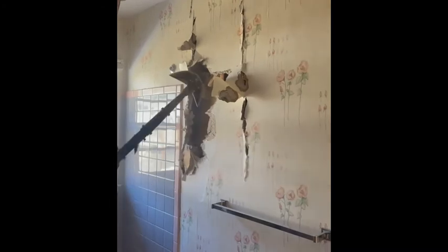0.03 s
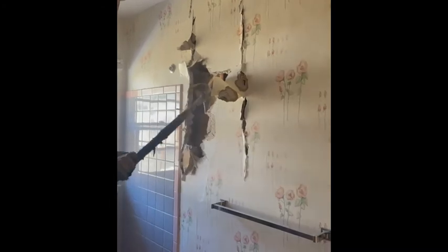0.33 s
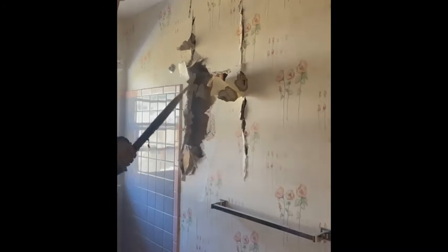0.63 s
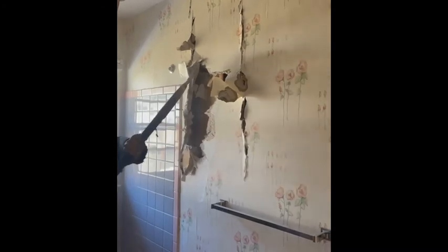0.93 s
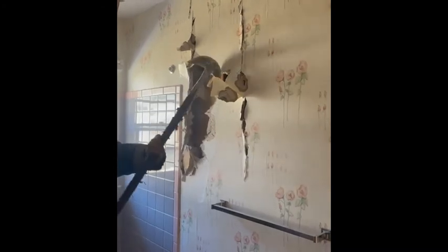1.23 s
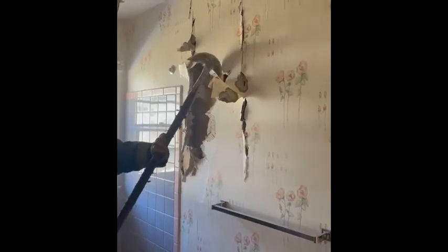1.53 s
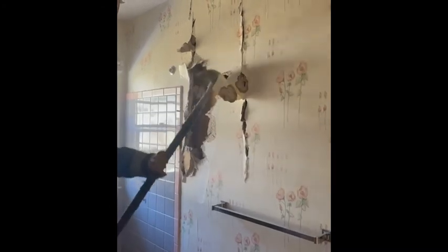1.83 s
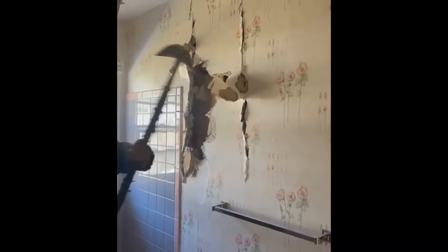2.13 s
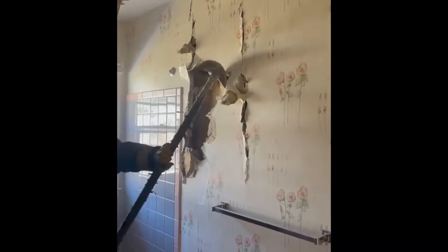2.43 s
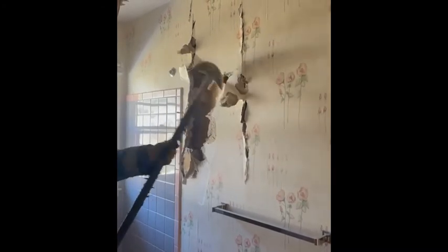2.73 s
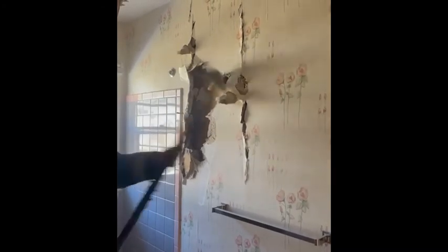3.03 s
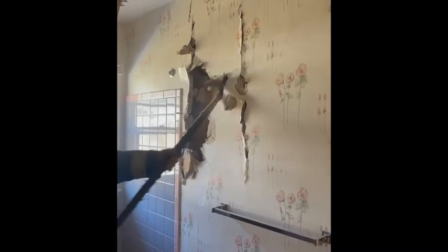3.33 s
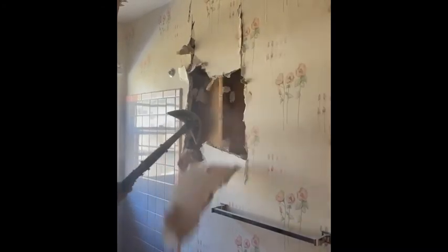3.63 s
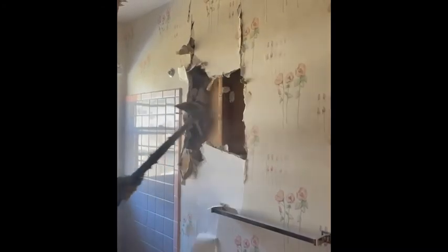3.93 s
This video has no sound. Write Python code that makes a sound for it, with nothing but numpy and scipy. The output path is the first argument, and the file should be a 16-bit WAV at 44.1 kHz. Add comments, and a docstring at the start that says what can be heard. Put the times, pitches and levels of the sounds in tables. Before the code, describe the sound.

A steel hook knocks, scrapes and smashes through wallboard until a slab crashes down.

```python
"""In a small tiled room, over a low wavering hum, a steel hook on a long pole scrapes at a rumbling wall.
The hook knocks on the hard frame, and its steel head rings on. From about 1.2 s it bites into the wallboard:
each blow cracks the gypsum and makes the hollow wall boom, and grit trickles in between.
Near 2.5 s the prying hook squeaks. At last a slab tears loose in a shower of crumbs and crashes down."""
import sys
import numpy as np
from scipy import signal
from scipy.fft import rfft, irfft
from scipy.io import wavfile

SR = 44100
rng = np.random.default_rng(int(sys.argv[2]) if len(sys.argv) > 2 else 0)


def transcribe(signal):
    """Save signal, clipped to [-1, 1], as a 16-bit WAV file at the path in sys.argv[1]."""
    frames = np.atleast_2d(signal).T
    limited = np.clip(frames, -1, 1)
    pcm = np.round(limited * 32767).astype(np.int16)
    wavfile.write(sys.argv[1], SR, pcm)


N = 176400
HIT_N = SR  # samples in one hit and its echo
AGE, HZ = np.arange(HIT_N) / SR, np.fft.rfftfreq(HIT_N, 1 / SR)  # time and frequency axes of a hit


def undb(db):
    """Turn decibels into a factor to multiply by."""
    return 10 ** (np.asarray(db) / 20)


def unit(x):
    """Scale x to an average (rms) size of 1."""
    return x / np.sqrt(np.mean(x ** 2))


def on_log(hz, points):
    """Read between (frequency, value) points, with octaves evenly spaced."""
    f, values = np.array(points).T
    return np.interp(np.log(hz + 1), np.log(f), values)


def shape(x, gain):
    """Filter x: gain(f) says how much of each frequency to keep."""
    n = x.shape[-1]
    return irfft(rfft(x) * gain(np.fft.rfftfreq(n, 1 / SR)), n)


def causal(gain):
    """Turn a gain curve into a filter that makes no sound before the hit (minimum phase)."""
    cepstrum = irfft(np.log(gain + 1e-5))
    cepstrum[1:HIT_N // 2] *= 2
    cepstrum[HIT_N // 2 + 1:] = 0
    return np.exp(rfft(cepstrum))


def peak(hz, width_hz):
    """A bump of height 1 around one frequency."""
    return 1 / (1 + (2 * (HZ - hz) / width_hz) ** 2)


def burst(x, db, span_s=.04):
    """Give a hit the energy of a steady sound that lasts span_s at this level."""
    return unit(x) * undb(db) * np.sqrt(span_s * SR / HIT_N)


def add(out, start, x):
    """Mix x in from a start time."""
    i = int(start * SR)
    out[:, i:i + x.shape[-1]] += x[:, :N - i]


def grains(n, per_s, spread_db=4):
    """Random clicks, most small and a few large."""
    size = undb(spread_db * np.minimum(rng.exponential(size=n), 5))
    return (rng.random(n) < per_s / SR) * size * rng.choice([-1, 1], n)


# How wide the sound is heard, swinging narrow and wide from pitch to pitch (f/Hz, side level over middle
# level/dB)
STEREO_WIDTH = [(130, -51), (260, -18), (430, -8), (580, -12), (1050, -4.5), (1800, -15.5), (2750, -2.5),
                (4600, -2.5), (5400, -5), (6400, 0.5), (7700, 20), (8900, 10), (10500, -16)]
def stereo_noise(n):
    """Noise that is alike in both ears in the bass and wide in the treble."""
    mid, side = rng.standard_normal((2, n))
    side = shape(side, lambda f: undb(on_log(f, STEREO_WIDTH)))
    pair = np.array([mid + side, mid - side])
    return shape(pair, lambda f: 1 / np.hypot(1, undb(on_log(f, STEREO_WIDTH))))


# How long the room echoes (f/Hz, time to fade by 60 dB/s)
ECHO_TIMES = [(200, 0.3), (700, 0.25), (2000, 0.24), (5000, 0.26), (11000, 0.17)]
def room(direct_db=-9, rise_s=.00058):
    """One click in the room: the direct sound, then dense echoes off the tiles."""
    noise = stereo_noise(HIT_N)
    centres, fades = zip(*ECHO_TIMES)
    tail = 0
    for weights, fade_s in zip(np.eye(len(centres)), fades):
        band = shape(noise, lambda f: on_log(f, list(zip(centres, weights))))
        tail = tail + band * 1000 ** (-AGE / fade_s)
    spectrum = rfft(tail)
    tail = irfft(spectrum / np.mean(np.abs(spectrum) ** 2, axis=0) ** .25)  # tame chance peaks
    tail *= (1 - np.exp(-AGE / rise_s)) * np.clip(2 - 4 * AGE, 0, 1)
    tail = unit(tail) / np.sqrt(HIT_N)
    tail[:, 0] += undb(direct_db)
    return tail


# Tone of the room's air (f/Hz, relative level/dB)
AIR_TONE = [(150, 21), (600, 19.5), (2000, -22), (12000, 1)]
def hum_and_air(hum_hz=66, waver_hz=2.6, hum_db=-54, air_db=-75):
    """A low hum wavers in pitch over the faint noise of the air."""
    drift = unit(shape(rng.standard_normal(N), lambda f: np.exp(-f / 4)))
    hum = np.sin(2 * np.pi * np.cumsum(hum_hz + waver_hz * drift) / SR)
    air = shape(stereo_noise(N), lambda f: undb(on_log(f, AIR_TONE)))
    return undb(hum_db) * unit(hum) + undb(air_db) * unit(air)


# How loud the strained wall groans (t/s, level/dB)
RUMBLE_LEVELS = [(0, -37), (.35, -45.5), (.6, -49), (1.14, -59.5), (1.45, -40), (2.07, -46.5), (2.38, -33),
                 (2.92, -50), (3.2, -27), (3.68, -38), (4, -39)]
# Tone of that groan (f/Hz, relative level/dB)
RUMBLE_TONE = [(20, -37), (48, -1), (66, 13), (78, 0), (600, -20), (1500, -29.5), (5000, -66)]
def wall_rumble(t):
    """The hollow wall rumbles while the hook drags and levers at it."""
    rumble = shape(stereo_noise(N), lambda f: undb(on_log(f, RUMBLE_TONE)))
    return unit(rumble) * undb(np.interp(t, *np.array(RUMBLE_LEVELS).T))


# Pitches at which the board and the hook in it ring (f/Hz, width/Hz, boost/dB)
BOARD_PEAKS = [(69.2, 5.3, 6), (396, 33, 3), (520.6, 24, 5.5), (638, 123, 3.5), (899, 84, 3.5),
               (1377, 36, 1), (2300, 33, 3.5), (3510, 14, 7), (4600, 190, -8.5)]
def board_boost_db():
    """The board and hook make some pitches louder and one softer."""
    return sum(db * peak(hz, width) for hz, width, db in BOARD_PEAKS)


# Scraping and falling crumbs, before each layer's boost (t/s, rasp level/dB, grit level/dB)
CRUMB_LEVELS = [(0, -48.5, -64.5), (.17, -49.5, -68.5), (.25, -63.5, -73), (.67, -56.5, -68),
                (.83, -65.5, -72.5), (1.48, -62, -73.5), (1.7, -57.5, -64.5), (1.81, -57, -50),
                (1.88, -54, -61), (2, -70.5, -85), (2.29, -45, -56), (2.4, -60, -70), (2.548, -47, -52),
                (2.6, -55.5, -65), (2.681, -48.5, -48), (2.78, -63.5, -73.5), (2.94, -66, -70),
                (3.1, -38, -67), (3.24, -50.5, -60), (3.329, -30.5, -37), (3.52, -45.5, -48.5),
                (3.59, -31, -36.5), (3.759, -24.5, -25), (3.839, -35.5, -34), (3.888, -25, -27.5),
                (4, -37.5, -52.5)]
# Tone of the rough rasp (f/Hz, relative level/dB)
RASP_TONE = [(200, 4.5), (1400, -1), (2300, 1), (6000, -5.5), (7500, -30), (12000, -20)]
# Tone of the fine grit (f/Hz, relative level/dB)
GRIT_TONE = [(2000, -3), (5000, 6), (7000, 3), (10500, 2), (12500, -13)]
def crumbs(t, spots=4, per_s=650, ring_share=.37, rasp_boost_db=1, grit_boost_db=3):
    """Gypsum grains rasp under the hook and shower down at several spots as the slab tears away."""
    times, rasp_db, grit_db = np.array(CRUMB_LEVELS).T
    clicks = sum(rfft(grains(N, per_s / spots)) * rfft(room(), N) for _ in range(spots))
    out = 0
    for levels, tone in ((rasp_db + rasp_boost_db, RASP_TONE), (grit_db + grit_boost_db, GRIT_TONE)):
        one_grain = irfft(causal(undb(on_log(HZ, tone) + ring_share * board_boost_db())))
        shower = unit(irfft(clicks * rfft(one_grain, N), N))
        out = out + shower * undb(np.interp(t, times, levels))
    return out


# Knocks on the frame (t/s, level/dB, pitch factor, treble cut-off/Hz, spot from hook's point 0 to back 1)
FRAME_KNOCKS = [(.095, -24, 1.01, 2100, 0), (.505, -25.5, 1.023, 1830, 1), (.665, -46.5, .92, 1100, 1),
                (.76, -44, .9, 905, 0.61), (2.672, -46, 1.2, 1500, 0.79), (2.724, -45.5, 1, 980, 0.65)]
# Notes of hook and pole (f/Hz, width/Hz, level when hit on the point/dB, level when hit on the back/dB)
HOOK_NOTES = [(345, 170, 5.5, 0), (515, 34, 8, 0), (686.6, 35, 6, 12), (858, 35, 5, 3.5), (922, 34, 3, 0.5),
              (1070, 81, 1.5, -4), (1198, 24, 0, 3.5), (1526, 35, -2, 8.5), (1659, 14, 3, -14),
              (2680, 2400, -16, -19.5)]
# The head chatters within each knock (t/s after the knock, relative level/dB)
BOUNCES = [(0, -1.5), (.004, -1.5), (.018, -6.5)]
def hook_knocks(bass_cut_hz=200):
    """Each knock rings the hook and its pole; the spot that lands sets the mix of notes."""
    out = np.zeros((2, N))
    for start, db, pitch, top_hz, spot in FRAME_KNOCKS:
        power = sum(undb(point_db + spot * (back_db - point_db)) ** 2 * peak(hz * pitch, width)
                    for hz, width, point_db, back_db in HOOK_NOTES)
        tone = np.sqrt(power / (1 + (HZ / top_hz) ** 4))
        tone *= HZ ** 2 / (HZ ** 2 + bass_cut_hz ** 2)
        chatter = sum(undb(bounce_db) * rfft(room()) * np.exp(-2j * np.pi * HZ * delay)
                      for delay, bounce_db in BOUNCES)
        add(out, start, burst(irfft(chatter * causal(tone)), db))
    return out


# Notes of the free steel head (f/Hz, level/dB, time to fade by 60 dB/s)
STEEL_NOTES = [(1465, -58, 6.3), (607, -65, 2)]
def steel_ring(start_s=.505):
    """After one knock the head swings free and sings on, faded out after a second."""
    out = np.zeros((2, N))
    ring = sum(undb(db) * np.sin(2 * np.pi * hz * AGE) * 1000 ** (-AGE / fade_s)
               for hz, db, fade_s in STEEL_NOTES)
    fade_out = np.minimum(1, (1 - AGE) * 10)
    add(out, start_s, (ring * fade_out)[None])
    return out


def panel_ring(spectrum, delay, rise_s, fade_s):
    """The struck panel starts late, builds up and dies away."""
    noise = signal.hilbert(irfft(spectrum))
    steadier = noise.real / np.sqrt(np.abs(noise).mean(axis=0))
    age = np.maximum(AGE - delay, 0)
    return steadier * (1 - np.exp(-age / rise_s)) * 1000 ** (-age / fade_s)


def slap(delay, hz, decay_s):
    """A few swings that die quickly after a sudden push."""
    age = np.maximum(AGE - delay, 0)
    return unit(np.sin(2 * np.pi * hz * age) * age * np.exp(-2 * age / decay_s))


# Blows on the board (t/s, then level/dB of boom, body, knock, crack and dust,
# then crumbling time/s, bass delay/s, panel f/Hz)
BOARD_BLOWS = [(.388, -62, -59, -47.5, -56, -62, 0.0052, 0.006, 153),
               (1.178, -31.5, -17.5, -32, -43, -56, 0.0037, .011, 187),
               (1.250, -18.5, -15, -22.5, -36, -46, .011, .02, 195),
               (1.551, -57, -28.5, -38.5, -41.5, -45, 0.013, 0.012, 134),
               (1.582, -20, -21, -47, -53, -49, .0086, 0.0067, 131),
               (1.773, -41, -46, -47.5, -50, -52, 0.0086, 0.0043, 250),
               (1.934, -47, -41.5, -54.5, -62.5, -72, 0.0081, .004, 348),
               (2.131, -53, -42, -28, -40, -50, 0.0084, 0.0052, 218),
               (2.149, -55, -47, -34, -28.5, -29.5, 0.0025, .004, 218),
               (2.153, -15.5, -8.5, -13, -22.5, -31.5, 0.0026, .0085, 128),
               (2.315, -27, -30, -44, -48, -61, 0.013, 0.0092, 108),
               (2.636, -37, -45, -37.5, -61, -70, 0.0052, 0.005, 193),
               (2.982, -52, -32, -33.5, -22.5, -30, 0.0084, .0061, 128),
               (2.991, -11.5, -12, -12.5, -18.5, -22.5, 0.0065, .0108, 137),
               (3.036, -17, -24.5, -27, -55, -56, 0.0067, 0.0013, 130),
               (3.321, -23, -14, -27, -22.5, -24.5, 0.0033, 0.01, 176),
               (3.372, -15, -13.5, -31.5, -52, -60, 0.0073, 0.0025, 127),
               (3.450, -30, -40, -48, -34, -37, 0.014, 0.0066, 129),
               (3.738, -29, -18.5, -13.5, -17.5, -25, 0.0021, 0.0069, 214),
               (3.748, -36, -30.5, -26.5, -24.5, -38, 0.0019, 0.0016, 212),
               (3.859, -16.5, -14, -12.5, -18.5, -25, 0.0074, .0078, 235)]
# Tone of breaking board (f/Hz, relative level/dB)
BREAK_TONE = [(25, -24), (42, -11.5), (60, 4), (120, -4), (250, -8), (450, -15.5), (1600, -22.5),
              (3500, -25), (5600, -28), (7400, -38), (11000, -40)]
# Borders between boom, body, knock, crack and dust (f/Hz)
BAND_EDGES = [105, 400, 1800, 6200]
def wallboard_blows(fractures_per_s=2500, fracture_db=4.5, panel_boost_db=6, slap_db=-2, clack_hz=625):
    """Each blow is a clack and a run of tiny breaks; the panel slaps back and the hollow wall booms."""
    tone = unit(undb(on_log(HZ, BREAK_TONE) + board_boost_db()))
    below = [0 * HZ] + [1 / (1 + (HZ / edge) ** 8) for edge in BAND_EDGES] + [1 + 0 * HZ]
    bands = [causal(tone * np.sqrt(np.abs(hi - lo))) for lo, hi in zip(below, below[1:])]
    out = np.zeros((2, N))
    for start, *levels, crumble_s, delay, panel_hz in BOARD_BLOWS:
        sharpness = 1 / (1 + crumble_s / .0041)  # blows that crumble longer start more softly
        fractures = grains(HIT_N, fractures_per_s) * np.sqrt(AGE) * np.exp(-AGE / crumble_s)
        force = undb(fracture_db) * unit(fractures + 1e-18) / np.sqrt(HIT_N)
        force[0] += sharpness
        echoed = rfft(force) * rfft(room())
        knock, crack, dust = [irfft(echoed * band) for band in bands[2:]]
        panel = rfft(stereo_noise(HIT_N)) * undb(panel_boost_db * peak(panel_hz, width_hz=33))
        boom = panel_ring(panel * bands[0], delay, rise_s=.015, fade_s=.39)
        body = panel_ring(panel * bands[1], delay, rise_s=.0017, fade_s=.32)
        snap = undb(slap_db) * sharpness
        body = unit(body) + snap * slap(delay, panel_hz, decay_s=.0041)  # the panel's first flex
        knock = unit(knock) + snap * slap(0, clack_hz, decay_s=.0029)  # the hook's first touch
        parts = (boom, body, knock, crack, dust)
        add(out, start, sum(burst(part, db) for part, db in zip(parts, levels)))
    return out


def squeak(t, at_s=2.535, spread_s=.034, hz=2200, width_hz=300, db=-47):
    """The prying hook sticks and slips on the board; the slips ring at one pitch."""
    slips = irfft(rfft(grains(N, per_s=650)) * rfft(room(), N), N)
    ring = shape(slips, lambda f: 1 / (1 + 2j * (f - hz) / width_hz))
    return unit(ring) * undb(db) * np.exp(-((t - at_s) / spread_s) ** 2 / 2)


def scene():
    """Add up the short sounds and the ones that run throughout."""
    t = np.arange(N) / SR
    short_sounds = wallboard_blows() + hook_knocks() + steel_ring() + squeak(t)
    return short_sounds + crumbs(t) + wall_rumble(t) + hum_and_air()


def record(dry, shared_bass_hz=170, low_hz=24, ceiling=.85, top_hz=12000):
    """Two close microphones hear the same bass; the deepest lows are removed and peaks are rounded off, and the
    recorder cuts the highs."""
    mid = dry.mean(axis=0)
    pair = mid + shape(dry - mid, lambda f: f ** 4 / (f ** 4 + shared_bass_hz ** 4))
    pair = signal.sosfilt(signal.butter(2, low_hz, "high", fs=SR, output="sos"), pair)
    rounded = pair / (1 + (pair / ceiling) ** 6) ** (1 / 6)
    return signal.sosfiltfilt(signal.ellip(8, .1, 50, top_hz, fs=SR, output="sos"), rounded)


dry = scene()
out = record(dry)
transcribe(out)
```